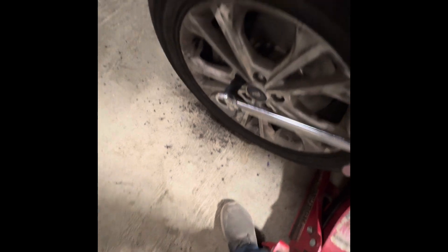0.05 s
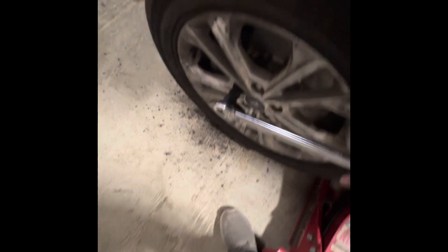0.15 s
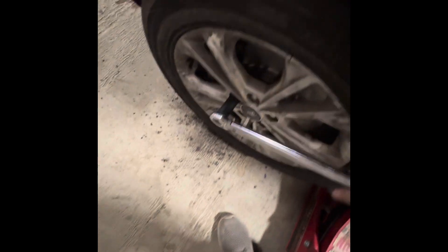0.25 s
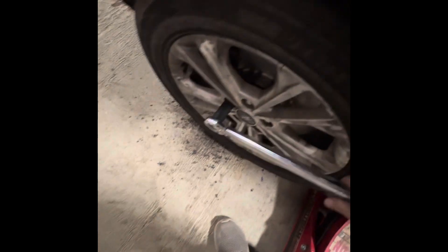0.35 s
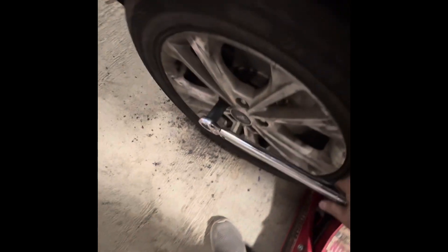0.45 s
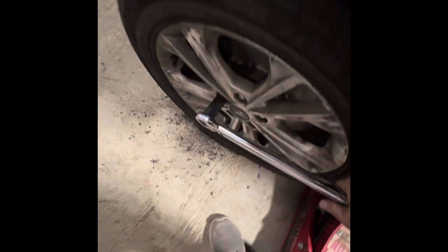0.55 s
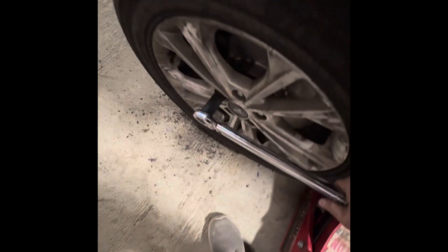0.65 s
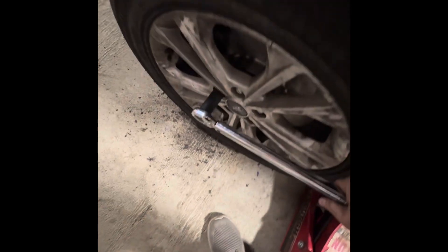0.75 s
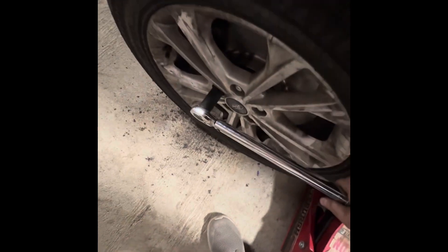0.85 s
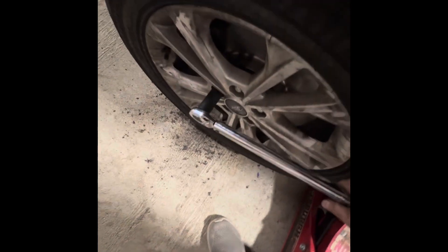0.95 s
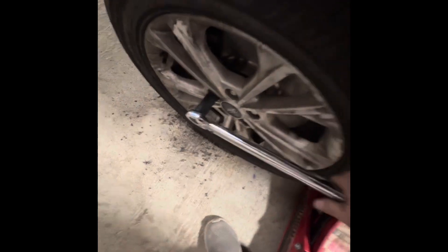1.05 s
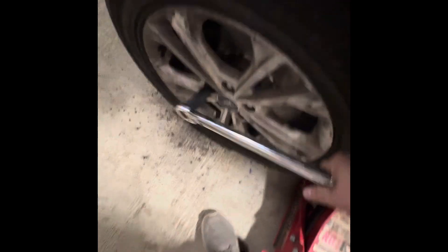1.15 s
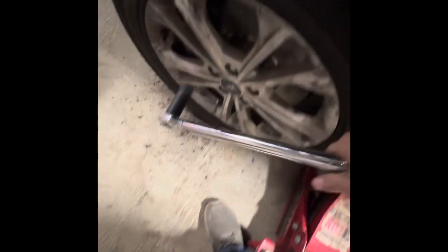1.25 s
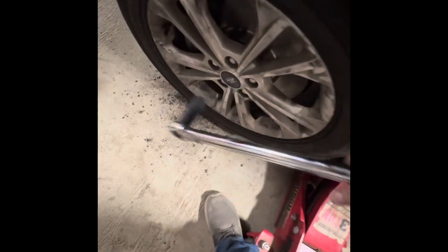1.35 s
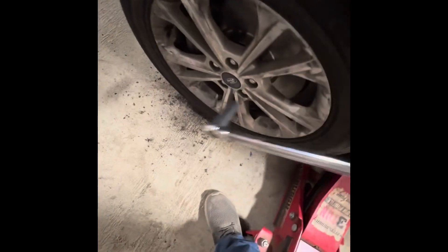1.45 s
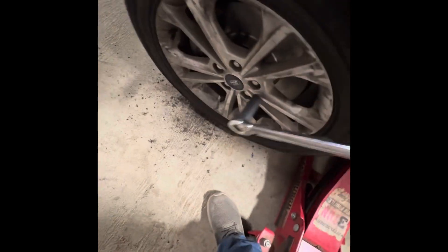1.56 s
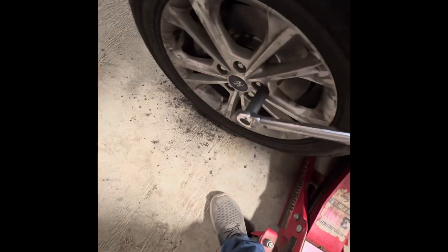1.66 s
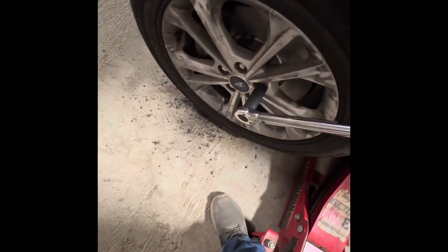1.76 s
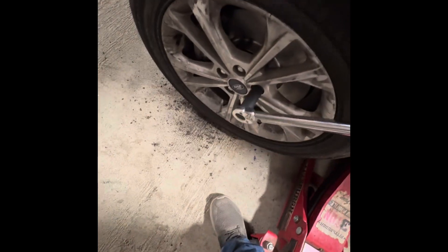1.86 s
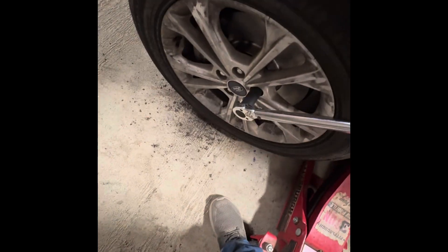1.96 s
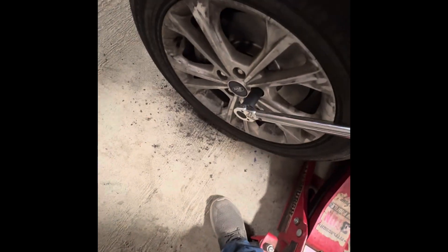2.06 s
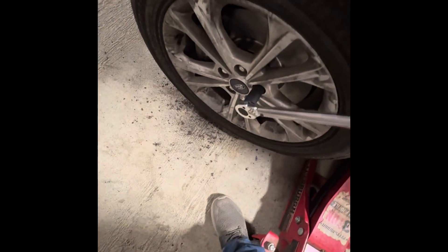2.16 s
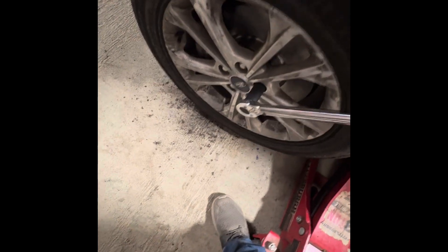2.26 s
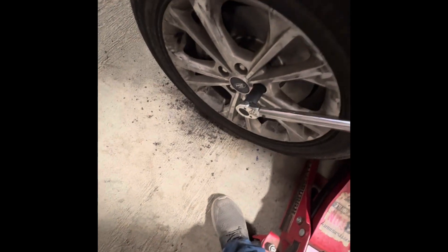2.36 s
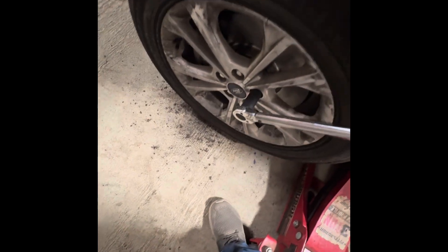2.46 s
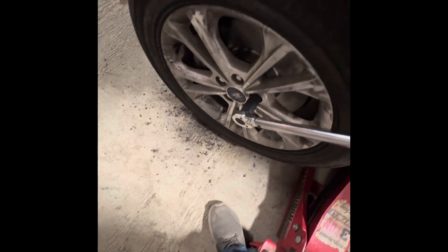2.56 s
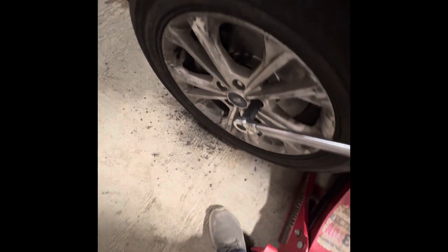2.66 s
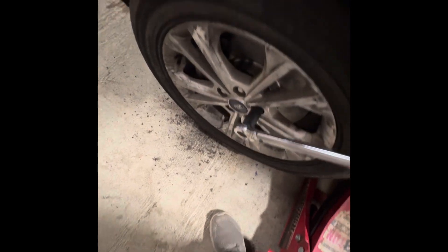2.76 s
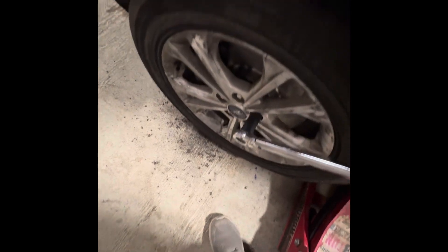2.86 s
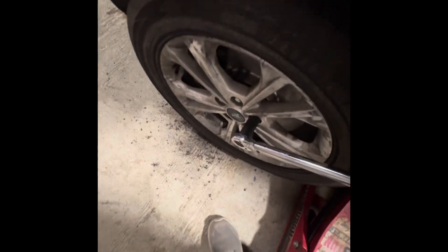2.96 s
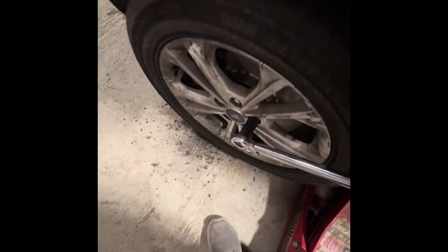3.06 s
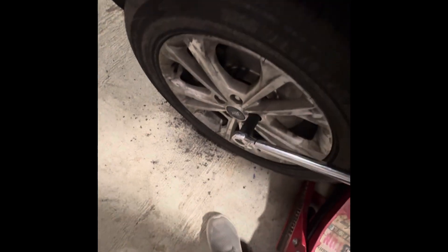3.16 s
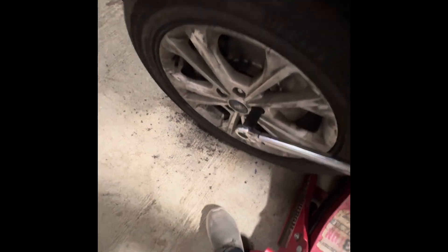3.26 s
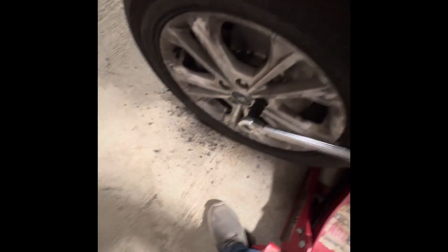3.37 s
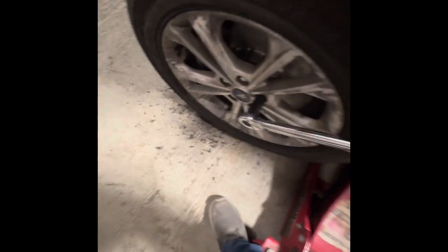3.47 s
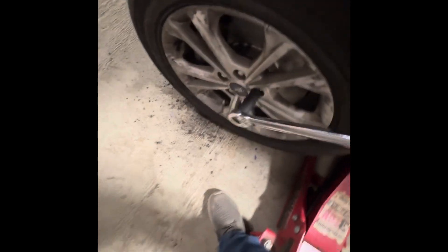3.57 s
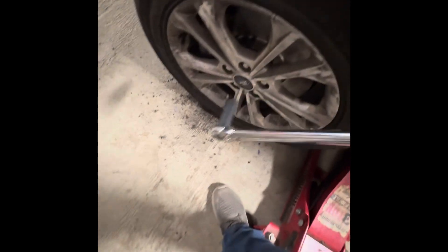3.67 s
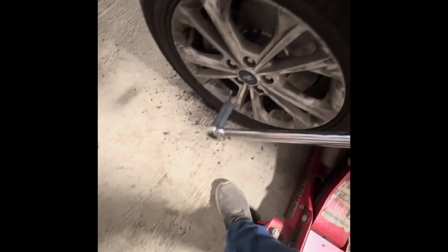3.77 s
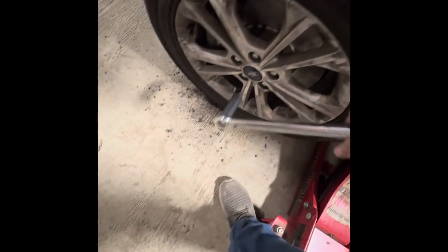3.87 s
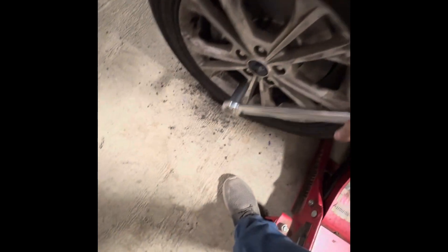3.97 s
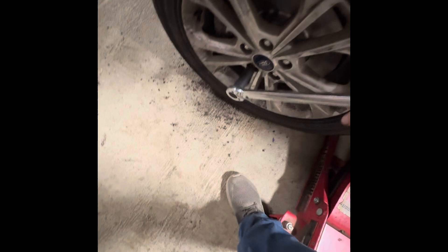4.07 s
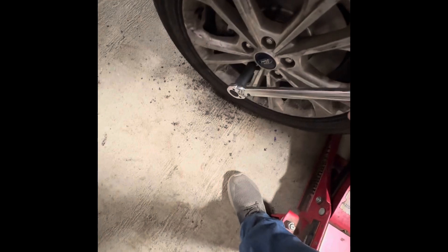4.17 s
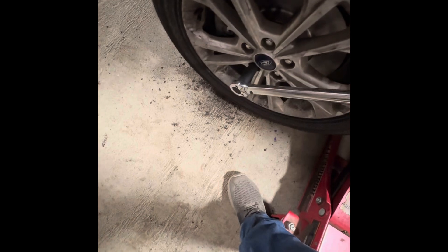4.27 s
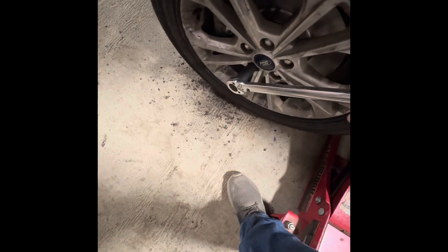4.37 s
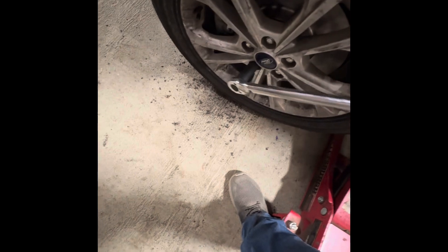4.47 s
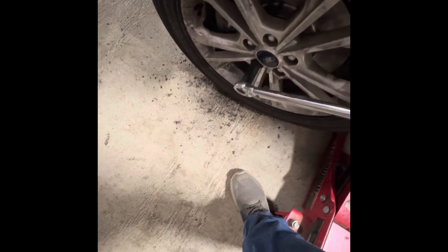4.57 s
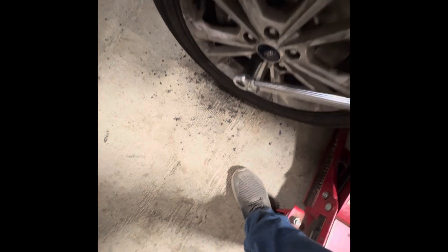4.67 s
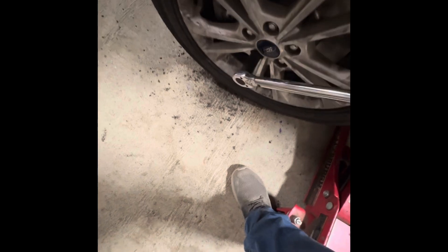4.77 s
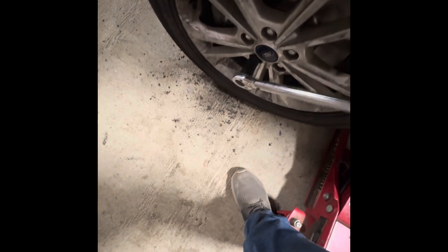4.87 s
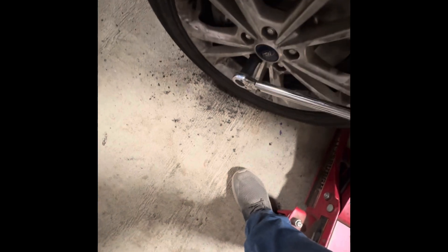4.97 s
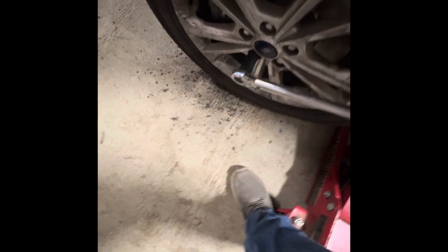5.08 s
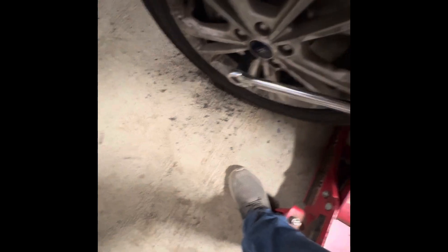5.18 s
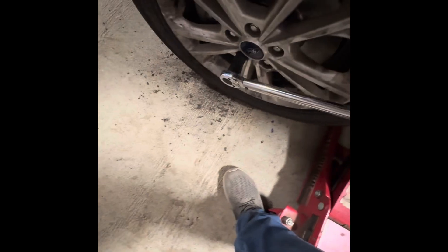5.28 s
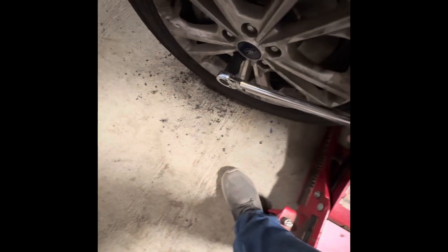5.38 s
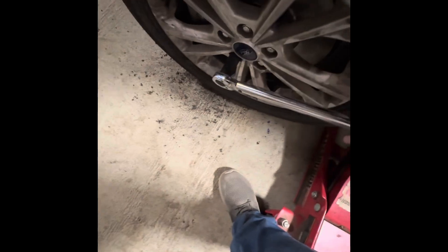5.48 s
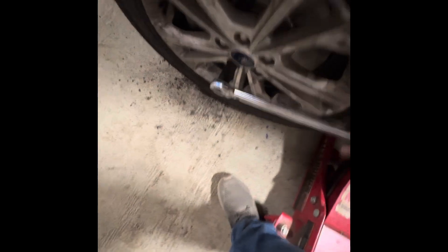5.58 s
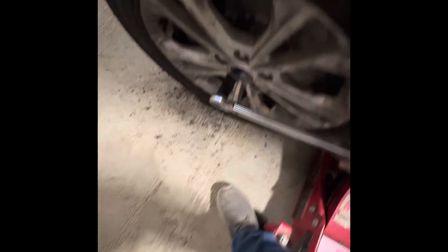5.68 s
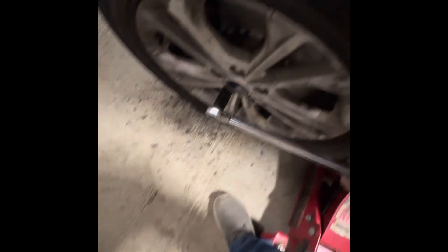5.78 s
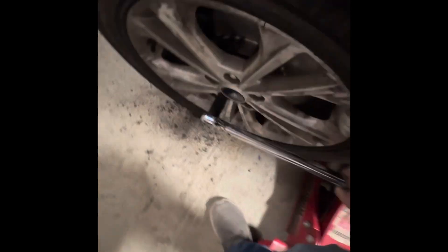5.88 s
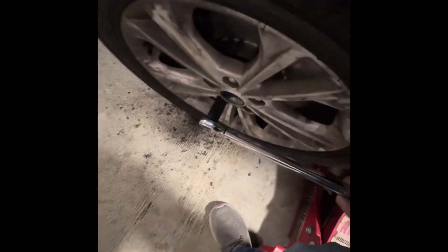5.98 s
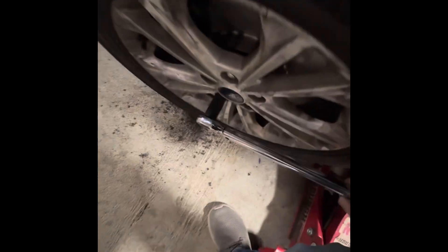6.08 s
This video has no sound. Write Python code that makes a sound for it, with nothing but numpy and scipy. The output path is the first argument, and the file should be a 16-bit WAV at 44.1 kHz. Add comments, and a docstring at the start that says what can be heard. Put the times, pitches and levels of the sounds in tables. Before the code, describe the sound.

Sharp double steel clicks from a wrench on a car wheel, clanking socket knocks and rattles between, ending on the hardest, heaviest snap.

```python
"""In a garage a torque wrench breaks over on a wheel nut: a double steel snap, then a low jolt of the car.
It snaps back as the hand eases, and the socket knocks on nuts and rim. Fine grinding leads into the second
break-over; after its snap back come more knocks, then a last short grind and the hardest break-over.
Blows are coloured noise cracks plus decaying sines; jolts are sinking low notes; grinding is random ticks.
Echoes and slowly swelling room noise surround it; the microphone's gain control ducks under loud sounds."""
import sys
import numpy as np
from scipy import signal
from scipy.fft import rfft, irfft, next_fast_len
from scipy.io import wavfile
from scipy.ndimage import uniform_filter1d, minimum_filter1d

SR = 44100
rng = np.random.default_rng(int(sys.argv[2]) if len(sys.argv) > 2 else 0)


def master(y):
    """Save y as 16-bit WAV."""
    cut = np.clip(np.atleast_2d(y).T, -1, 1)
    pcm = np.round(cut * 32767)  # scale
    wavfile.write(sys.argv[1], SR, pcm.astype(np.int16))


N = 269836
HIT = np.arange(int(.6 * SR)) / SR  # time axis of one blow (s)
LEAD = len(HIT) // 20  # samples in a short stretch of 30 ms
KNOCK_RISE_S = .001

# break-overs, where the pawl trips and then hits its stop: start_s, travel_s, trip_db, stop_db,
# trip_tilt (dB per octave), trip_rise_s, trip_t60_s, note_db, jolt_db (of the car)
BREAKS = [(0.6846, 0.007, 2, 14.5, -0.5, 0.00079, 0.044, -4.5, 6),
          (3.1403, .0087, 4.5, 12.5, 1, 0.0005, 0.012, -4.5, -10),
          (5.9221, 0.0075, 8.5, 24, -2, 0.001, 0.097, -9, 12.5)]
# snaps back as the hand eases: start_s, travel_s, trip_db, stop_db,
# trip_tilt (dB per octave), trip_rise_s, trip_t60_s, note_db, sway_db (of the car)
RESETS = [(0.954, .0072, -21.5, 2, 2, .00048, 0.11, -20, -26.5),
          (3.3827, .0083, -14, -0.5, 6, .002, 0.019, -17.5, -49.5)]
# ringing of the wrench tube: pitch_hz, level_db, t60_s
WRENCH_MODES = [(900, -19, .04), (2020, -16, .025), (2790, -7, .045), (2900, -11, .04), (4140, -10, .03),
                (4480, -10, .04), (5020, -10, .04), (5330, -9, .04), (6282, -10, .03), (6700, -9, .03),
                (8570, -9, .08), (9254, -13, .15), (9770, -10, .07)]
# ringing of the wheel with the socket on it: pitch_hz, level_db, t60_s
WHEEL_MODES = [(415, 0, .08), (468, 2, .17), (506, -7, .5), (872, 2, .1), (899, -8, .45), (935, -8, .25),
               (1290, -1, .07), (1475, -10, .15), (1583, -7, .14), (2022, -7, .28), (2073, -5, .18),
               (2196, -10, .22), (2242, -7, .33), (2320, -5, .27), (2353, -10, .3), (2430, -7, .12),
               (2640, -7, .15), (2775, -10, .25), (2853, -9, .2), (3117, -9, .3), (3483, -12, .2),
               (3639, -10, .2), (3720, -7, .25), (3890, -9, .25), (4199, -11, .4), (4298, -6, .35),
               (4450, -9, .15), (4511, -9, .3), (5260, -5, .08), (5980, -10, .12), (8300, -9, .06),
               (10150, -2, .04)]
# steady hum and air of the garage: pitch_hz, relative level_db per hertz
AIR = [(15, -47), (25, -21), (60, -6), (102, -1.5), (200, -12), (240, -5.5), (354, -8.5), (695, -15.5),
       (840, -16.5), (1330, -22.5), (4370, -24.5), (6740, -45.5), (9840, -34), (11600, -61.5),
       (16000, -57.5)]
# likeness of the left and right channels: pitch_hz, correlation (-1 to 1)
LIKENESS = [(50, 1), (140, 0.99), (250, 0.95), (1000, 0.56), (2500, 0.73), (5000, 0.047), (9000, 0.11),
            (13000, 1)]


def snaps():
    """Steel strikes steel inside the wrench: hard break-overs and lighter snaps back."""
    return pawl(BREAKS, stop_tilt=0.69, tyre_db=-54) + pawl(RESETS, stop_tilt=1, tyre_db=-33.0)


def pawl(rows, stop_tilt, tyre_db):
    """A short noise swell and a brief note lead into the pawl's trip and its slap inside the tube; the tyre hums on."""
    # colour of the bare contact: pitch_hz, relative level_db per hertz
    snap_colour = [(100, 2.5), (350, 12), (650, -2.5), (900, -1), (1150, -5), (1500, -0.5), (2000, 0),
                   (2800, 2), (3500, 3), (5000, 3.5), (7500, 4.5), (9800, 6), (10900, -5.5), (11700, -11.5),
                   (15500, -5.5)]
    # humming of the tyre: pitch_hz, level_db, t60_s
    tyre_modes = [(173.2, -2, 0.45), (290, -4.5, 0.14), (370, -4, 0.24), (390, -4, 0.34), (480, -6.5, 0.5)]
    note_hz, note_peak_s, note_swell_s, note_fade_s = 4810, 0.0027, 0.003, 0.0023
    trip_top_hz, trip_left_db, swell_db = 8420, -0.5, -23.5
    out, hz = np.zeros((2, N)), bins(len(HIT))
    colour = at_hz(snap_colour, hz)
    octaves = np.log2(np.maximum(hz, 100) / 4000)  # tilts pivot at 4 kHz
    dull = -10 * np.log10(1 + (hz / trip_top_hz) ** 8)  # trip and swell lose their top
    t = HIT - HIT[LEAD]
    note_envelope = np.exp(-np.maximum(-t / note_swell_s, t / note_fade_s))
    note = np.sin(2 * np.pi * note_hz * t) * note_envelope
    for start_s, travel_s, trip_db, stop_db, trip_tilt, rise_s, t60_s, note_db, _ in rows:
        trip = strike(colour + dull + trip_tilt * octaves, rise_s, t60_s, WRENCH_MODES, 0,
                      ring_db=-13.0, scatter_db=9.5)
        stop = strike(colour + stop_tilt * octaves, 0.00043, 0.016, WRENCH_MODES, 0,
                      ring_db=-15.5, scatter_db=1.0)
        swell, lead_s = noise_swell(colour + dull, swell_s=.003)
        add(out, from_db(trip_db + swell_db) * swell, start_s - lead_s)
        add(out, from_db(note_db) * note, start_s + note_peak_s + t[0])
        add(out, from_db(trip_db) * lean(trip_left_db) * trip, start_s)
        add(out, from_db(stop_db) * (stop + ring(tyre_modes, tyre_db)), start_s + travel_s)
    return out


def thuds(glide_s):
    """Sudden slack jolts the car, and a harder jolt rebounds more; after each snap back the car sways."""
    # jolt, two rebounds and a sway after every break-over:
    # delay_s, level_db, pitch_hz, swell_s, start_hz, follow (dB per dB of jolt)
    car_motion = [(0, 1.5, 56, 0.021, 298, 1), (0.053, -4.5, 51.3, 0.032, 58.1, 1.52),
                  (0.108, -21, 64, .01, 225, 2.08), (.146, -23.5, 44.84, 0.068, 47.9, 1.43)]
    settle_delay_s, settle_hz, settle_swell_s = .03, 46.8, .09
    out = np.zeros((2, N))
    for start_s, *_, jolt_db in BREAKS:
        for delay_s, level_db, pitch_hz, swell_s, start_hz, follow in car_motion:
            heave = shudder(pitch_hz, start_hz, swell_s, glide_s, rumble_db=-29.0)
            add(out, from_db(level_db + follow * jolt_db) * heave, start_s + delay_s)
    for start_s, *_, sway_db in RESETS:
        sway = shudder(settle_hz, settle_hz, settle_swell_s, glide_s, rumble_db=-18.5)
        add(out, from_db(sway_db) * sway, start_s + settle_delay_s)
    return out


def knocks(crack_db, swell_db):
    """Socket knocks and the dull body of the snaps; each contact's hardness colours crack and wheel ring alike."""
    # knocks on nuts and rim, and the dull body of the snaps: start_s, level_db,
    # hardness (tilt, dB per octave), clank_db (of the struck spot), clank_hz, t60_s
    knock_rows = [(.9745, -15.5, -3.5, 2, 805, 0.066), (1.5857, -28, -1, -5.5, 1550, 0.055),
                  (1.6751, -14, 2.5, -12, 2440, 0.018), (1.8186, -20, 0.5, 13, 2000, 0.016),
                  (1.829, -20, 6, 14, 1010, 0.069), (1.847, -30, -4.5, 15, 3270, .035),
                  (1.8585, -27.5, 2, 0, 1427, 0.015), (1.8659, -8, 3.5, -15, 985, 0.0485),
                  (1.8692, -6.5, 0.5, -0.5, 1250, 0.022), (2.256, -44, -2, 0.5, 1420, 0.09),
                  (2.8811, -36.5, 5, 10, 1520, 0.056), (2.9612, -40.5, 1, 14, 1450, 0.027),
                  (2.972, -37, 16, -17, 1400, 0.013), (3.0885, -40, 4, 11, 1880, 0.025),
                  (3.403, -17.5, 4, 14, 970, .06), (4.0578, -12.5, -2.5, 17.5, 1300, 0.015),
                  (4.0648, -16.5, -2.5, 10.5, 2100, 0.0208), (4.0993, -32, -6.5, 30, 5100, 0.024),
                  (4.2392, -18, 3.5, 10.5, 1050, 0.041), (4.2455, -20.5, 0, 0, 1200, 0.0232),
                  (4.251, -19, 2.5, 9, 1400, 0.037), (4.2562, -21, 3, -18, 2870, 0.021),
                  (4.2605, -21, -3.5, 21, 2870, 0.032), (4.337, -27.5, -2.5, -7.5, 1250, 0.023),
                  (4.664, -51.5, -1, 17, 1955, 0.024), (4.7945, -46, -1, 0.5, 2970, 0.019),
                  (4.8305, -18, 3, 14.5, 2360, 0.032), (4.8365, -24.5, -2.5, -1, 850, 0.035),
                  (4.883, -34, 1, -15, 1100, 0.065), (5.1045, -35.5, -3, 5.5, 1040, 0.11),
                  (5.144, -38.5, -5, -8.5, 1390, 0.063), (5.771, -44, 23, 5, 2020, 0.17),
                  (5.859, -30.5, -3, 4, 1187, 0.017), (5.9235, 2.5, -5, 16, 708, .04)]
    # colour common to the knocks: pitch_hz, relative level_db per hertz
    knock_colour = [(60, -22.5), (170, 5), (280, -5.5), (420, 7), (650, -3.5), (880, 7.5), (1060, 3.5),
                    (1300, 6.5), (1750, 1.5), (2200, 5.5), (2650, 9), (3150, 5), (3500, 5), (4500, 4.5),
                    (4950, 1.5), (5350, 4), (7000, 0), (9500, -1.5), (10300, -4.5), (12000, -25.5),
                    (14700, -4.5), (16000, -17.5)]
    out, hz = np.zeros((2, N)), bins(len(HIT))
    mode_hz = np.array(WHEEL_MODES)[:, 0]
    for start_s, level_db, tilt, clank_db, clank_hz, t60_s in knock_rows:
        bands, share_db = contact(tilt, clank_db, clank_hz)
        density_db = share_db - 10 * np.log10(bands)  # band share to level per hertz
        colour = at_hz(knock_colour, hz) + at_hz(np.c_[bands, density_db], hz)
        weight_db = at_hz(np.c_[bands, share_db], mode_hz)
        sound = strike(colour, KNOCK_RISE_S, t60_s, WHEEL_MODES, weight_db, ring_db=-26.0, scatter_db=3.0)
        add(out, from_db(level_db + crack_db) * sound, start_s)
        swell, lead_s = noise_swell(colour, swell_s=0.0034)
        add(out, from_db(level_db + swell_db) * swell, start_s - lead_s)
    return out


def contact(tilt, clank_db, clank_hz):
    """How a contact shares out its energy: harder is brighter, and the struck spot favours or mutes one range."""
    clank_octaves, socket_low_hz = 0.85, 339
    hz = np.geomspace(130, 7500, 17)
    octaves = np.log2(hz / clank_hz)
    clank = clank_db * np.exp(-(octaves / clank_octaves) ** 2)
    bass_loss = 10 * np.log10(1 + (socket_low_hz / hz) ** 4)  # a small socket radiates little bass
    db = tilt * octaves + clank - bass_loss
    return hz, db - 10 * np.log10(np.mean(from_db(db) ** 2))


def pings():
    """A blow that reaches the wrench tube rings it, mostly in the modes that suit the struck spot."""
    # blows that ring the tube: start_s, level_db, favoured pitch_hz
    ping_rows = [(0.6837, -8, 2850), (1.586, -25, 4480), (1.675, -33, 9650), (3.149, -5, 2800),
                 (4.058, -27, 2800), (4.0987, -31.5, 4480), (4.2398, -15.5, 5400), (4.2587, -16.5, 2800),
                 (4.831, -17, 2800), (4.834, -21, 5000), (5.9245, 15, 2800)]
    width_octaves = .3
    out = np.zeros((2, N))
    mode_hz = np.array(WRENCH_MODES)[:, 0]
    attack = np.minimum(HIT / KNOCK_RISE_S, 1)
    for start_s, level_db, pitch_hz in ping_rows:
        weight_db = -10 * (np.log2(mode_hz / pitch_hz) / width_octaves) ** 2
        add(out, from_db(level_db) * attack * ring(WRENCH_MODES, weight_db), start_s)
    return out


def thumps():
    """The wheel takes the weight of the wrench in short, dull, low notes."""
    # thumps of the wheel: start_s, level_db, pitch_hz, swell_s
    thump_rows = [(0.963, -19.5, 290, 0.0094), (.968, -22, 93, 0.017), (1.584, -40.5, 215, 0.007),
                  (1.675, -28.5, 380, 0.0038), (1.83, -30, 430, 0.0046), (1.834, -40, 213, 0.0097),
                  (1.867, -18.5, 443, 0.0045), (3.149, -15, 330, 0.011), (3.399, -20.5, 380, 0.0051),
                  (4.255, -36, 220, 0.0073), (4.338, -41.5, 334, 0.0069), (4.833, -27, 209, 0.0027),
                  (5.11, -51.5, 242.7, 0.017), (5.139, -46, 112, 0.034), (5.924, 0, 550, 0.0039),
                  (5.933, -18, 237, 0.015), (5.941, -10, 135, 0.017)]
    out = np.zeros((2, N))
    for start_s, level_db, pitch_hz, swell_s in thump_rows:
        thump = shudder(pitch_hz, pitch_hz, swell_s, glide_s=1, rumble_db=-21)  # steady pitch
        add(out, from_db(level_db) * thump, start_s)
    return out


def rattles():
    """The loose socket buzzes on the wheel: a dying run of tiny contacts excites one cluster of its modes."""
    # buzzes after some knocks: start_s, level_db, centre_hz, t60_s
    rattle_rows = [(1.868, -34, 4180, 0.6), (1.872, -33.5, 2250, 0.2), (4.064, -41, 2250, 0.19),
                   (4.258, -45, 2400, 0.23), (4.262, -44, 3650, 0.34), (4.836, -37, 2200, 0.22),
                   (4.84, -43, 3230, 0.21), (5.107, -41, 2530, 0.089)]
    width_octaves, ticks_per_s, damped_t60_s = 0.13, 500, .016
    out = np.zeros((2, N))
    damped = [(hz, db, damped_t60_s) for hz, db, _ in WHEEL_MODES]  # the touching socket damps the ring
    mode_hz = np.array(damped)[:, 0]
    attack = np.minimum(HIT / KNOCK_RISE_S, 1)
    for start_s, level_db, centre_hz, t60_s in rattle_rows:
        body = attack * ring(damped, -10 * (np.log2(mode_hz / centre_hz) / width_octaves) ** 2)
        ticks = (rng.random(len(HIT)) < ticks_per_s / SR) * rng.standard_normal(len(HIT))
        buzz = rms_one(signal.fftconvolve(ticks[None], body, axes=1)[:, :len(HIT)])
        add(out, from_db(level_db - 60 * HIT / t60_s) * buzz, start_s)
    return out


def grind(slips_per_s, spread_db):
    """Tiny uneven slips between socket and nut as the load comes on; each rough spot ticks in its own way."""
    # flares of grinding: peak_s, level_db
    grind_rows = [(2.89, -60.5), (2.973, -48.5), (3.036, -61.5), (3.127, -41), (5.862, -56)]
    # colour of a slip: pitch_hz, relative level_db per hertz
    grind_colour = [(300, -19), (900, -17), (1500, 6), (2700, -2), (3800, -14.5), (6000, -7.5),
                    (10000, -8.5), (12000, -33)]
    rise_db_per_s, fall_db_per_s, slip_s, spots = 491, 183, .0008, 6
    t = np.arange(N) / SR
    load = sum(from_db(level_db - np.maximum(rise_db_per_s * (peak_s - t), fall_db_per_s * (t - peak_s)))
               for peak_s, level_db in grind_rows)
    out = 0
    for _ in range(spots):
        strength = from_db(spread_db * np.clip(rng.standard_normal(N), -2, 2))
        slips = (rng.random(N) < slips_per_s / spots / SR) * strength
        tick = burst(at_hz(grind_colour, bins(len(HIT))), HIT * np.exp(-HIT / slip_s), even_hz=600)
        out = out + signal.oaconvolve(slips[None], tick[:, :LEAD], axes=1)[:, :N]
    return load * rms_one(out)


def background():
    """Low room noise with faint hums and narrow whirs, and slow swells of low noise and of soft bright noise."""
    # slow swells of low noise and of soft bright noise: centre_s, half_length_s, low_db, bright_db
    swell_rows = [(0.22, 0.077, -53.5, -62), (0.653, 0.61, -55.5, -71), (1.552, 0.68, -58, -94.5),
                  (2.26, 0.3, -54.5, -67.5), (3.134, 0.21, -75.5, -53.5), (3.595, 0.27, -58.5, -61.5),
                  (4.385, 0.23, -53.5, -75.5), (5.155, 0.3, -54.5, -67), (5.296, 0.026, -56, -59.5),
                  (5.536, 0.058, -54, -62), (5.849, 0.16, -54.5, -58.5)]
    # lean of the room noise: pitch_hz, left_db (the right gets the opposite)
    air_lean = [(50, -0.5), (130, 0), (260, 0), (500, -3), (2000, -0.5)]
    # colour of the soft bright noise: pitch_hz, relative level_db per hertz
    bright_colour = [(500, -9.5), (1500, -3.5), (3200, 8), (5500, 5), (9500, -4.5), (11500, -22.5),
                     (16000, -21)]
    # faint hums and whirs: centre_hz, width_hz, level_db
    air_peaks = [(238, 12, -66), (360, 12, -66), (846, 12, -66), (870, 150, -68), (2340, 130, -69.5),
                 (4360, 190, -68)]
    air_db = -61
    size = next_fast_len(N, real=True)
    size += size % 2
    hz, t = bins(size), np.arange(size) / SR
    centre_s, half_s, low_db, bright_db = np.transpose(swell_rows)
    swells = np.exp(-((t - centre_s[:, None]) / half_s[:, None]) ** 2)
    low_level = np.sqrt(from_db(air_db) ** 2 + from_db(low_db) ** 2 @ swells)
    low = low_level * noise(at_hz(AIR, hz) + at_hz(air_lean, hz) * np.array([[1], [-1]]), size)
    bright = np.sqrt(from_db(bright_db) ** 2 @ swells) * noise(at_hz(bright_colour, hz), size)
    hum_power = 0
    for centre_hz, width_hz, level_db in air_peaks:
        peak = rms_one(1 / (1 + ((hz - centre_hz) / width_hz * 2) ** 2))
        hum_power = hum_power + (from_db(level_db) * peak) ** 2
    hums = np.sqrt(hum_power.mean()) * noise(10 * np.log10(hum_power), size)
    return (low + bright + hums)[:, :N]


def garage(x, near_db, far_db, near_t60, delay_s):
    """Quick echoes off the floor and car side, then the tail of the garage, dying band by band."""
    # hollow of the wheel and its well, heard in the echoes: pitch_hz, relative level_db
    echo_colour = [(80, 7.5), (170, 5.5), (300, 2), (410, 5), (490, 3.5), (650, -4), (800, 1), (895, 4),
                   (1020, -2), (1800, -1.5), (2300, -1), (3100, 1.5), (4300, -0.5), (5200, -3.5),
                   (10000, -3.5), (11500, -13.5), (15000, -27)]
    # decay of the garage: pitch_hz, t60_s
    garage_t60 = [(100, 0.68), (400, 0.51), (1000, 0.78), (3000, 0.64), (6000, 0.7), (10000, 0.53),
                  (11500, 0.084), (16000, 0.15)]
    t, hz = np.arange(SR) / SR, bins(SR)
    colour = at_hz(echo_colour, hz)
    spectrum = rfft(noise(colour, SR))
    centres = np.geomspace(60, 16000, 24)
    place = np.interp(hz, centres, np.arange(len(centres)))
    tail = 0
    for k, centre_hz in enumerate(centres):
        band = irfft(spectrum * np.maximum(1 - abs(place - k), 0), SR)  # overlapping triangles
        tail = tail + band * from_db(-60 * t / at_hz(garage_t60, centre_hz))
    near = burst(colour, from_db(-60 * t / near_t60), even_hz=119.2)
    echo = (from_db(near_db) * rms_one(near) + from_db(far_db) * rms_one(tail)) / np.sqrt(SR)
    echo = np.pad(echo, ((0, 0), (max(round(delay_s * SR), 0), 0)))
    return signal.fftconvolve(x, echo, axes=1)[:, :N]


def ports(x, lag_s):
    """Sound reaches the left microphone port a moment after the right, with its own balance at each pitch."""
    # balance of the ports: pitch_hz, left_over_right_db
    port_lean = [(50, .5), (140, -1), (300, -2), (430, -4), (620, 3), (880, 6), (1400, 1.5), (2100, 2.5),
                 (2800, 5.5), (3700, 1.5), (4800, 3.5), (6500, 0)]
    size = next_fast_len(2 * N, real=True)
    hz = bins(size)
    gains = lean(at_hz(port_lean, hz) / 2)
    gains = gains / np.sqrt(np.mean(gains ** 2, axis=0))
    lag = np.exp(-2j * np.pi * hz * lag_s * np.array([[1], [0]]))
    return irfft(rfft(x, size) * gains * lag, size)[:, :N]


def strike(colour_db, rise_s, t60_s, modes, weight_db, ring_db, scatter_db):
    """Steel on steel: a grainy crack shaped by the body's modes, then the modes ring, newly weighted each blow."""
    grain_db, ridge_db = 3.5, 1.5  # unevenness each half millisecond; emphasis of modes over gaps
    attack = np.minimum(HIT / max(rise_s, 1e-4), 1)
    knots = HIT[::20]
    uneven = np.interp(HIT, knots, np.clip(rng.standard_normal(len(knots)), -2, 2))
    grain = rms_one(from_db(grain_db * uneven))
    decay = from_db(-60 * np.maximum(HIT - rise_s, 0) / max(t60_s, .003))
    crack = burst(colour_db + ridge_db * ridges(modes), attack * grain * decay, even_hz=510)
    scatter = scatter_db * rng.standard_normal(len(modes))
    return crack + attack * ring(modes, ring_db + weight_db + scatter)


def noise_swell(colour_db, swell_s):
    """A short noise swell leading into a blow; returns the swell and its length (s)."""
    lead = HIT[:LEAD]
    envelope = np.exp(-lead[::-1] / max(swell_s, .001))
    return noise(colour_db, len(HIT))[:, :LEAD] * envelope, lead[-1]


def shudder(pitch_hz, start_hz, swell_s, glide_s, rumble_db):
    """One heave of a heavy body: a note that glides to its pitch, swells and dies, with a little rumble."""
    pitch = pitch_hz + (start_hz - pitch_hz) * np.exp(-HIT / glide_s)
    age = HIT / max(swell_s, .002)
    swell = age * np.exp((1 - age ** 2) / 2)  # peaks at 1 after swell_s
    hz = bins(len(HIT))
    rumble_colour = at_hz(AIR, hz) - 20 * np.log10(1 + (hz / 400) ** 2)
    rumble = from_db(rumble_db) * noise(rumble_colour, len(HIT))
    return swell * (np.sin(2 * np.pi * np.cumsum(pitch) / SR) + rumble)


def ring(modes, weight_db):
    """Dying sines of a body's modes, with phases slightly unlike in the two channels."""
    hz, level_db, t60_s = np.transpose(modes)
    unlike = np.sqrt(1 - np.clip(at_hz(LIKENESS, hz), -1, 1))
    phase = rng.uniform(0, 2 * np.pi, len(hz)) + rng.normal(0, 1, (2, len(hz))) * unlike
    return np.imag((from_db(level_db + weight_db) * np.exp(1j * phase)) @ swings(hz, t60_s))


def swings(hz, t60_s):
    """One decaying rotation for each mode, losing 60 dB in its t60."""
    step = np.exp((2j * np.pi * hz - np.log(1000) / np.clip(t60_s, .01, .7)) / SR)
    return np.cumprod(np.broadcast_to(step[:, None], (len(step), len(HIT))), axis=1)


def ridges(modes):
    """+1 on each of a body's modes, -1 in the gaps between them."""
    hz = np.sort(np.array(modes)[:, 0])
    knots = np.r_[hz[0] / 2, hz, hz[-1] * 1.1]
    place = np.interp(bins(len(HIT)), knots, np.r_[-.25, np.arange(len(hz)), len(hz) - .75])
    return np.cos(2 * np.pi * place)


def burst(colour_db, envelope, even_hz):
    """Stereo noise under an envelope, evened so that no chance pitch stands out, then coloured."""
    size = len(envelope)
    spectrum = rfft(noise(0, size) * envelope)
    width = max(int(even_hz * size / SR), 1)
    power = uniform_filter1d(np.mean(abs(spectrum) ** 2, axis=0), size=width)
    even = spectrum * np.sqrt(power.mean() / power)
    return irfft(even * rms_one(from_db(colour_db)), size) * np.linspace(1, 0, size)


def noise(colour_db, size):
    """Coloured stereo noise of unit power, its channels as alike at each pitch as LIKENESS says."""
    mid, side = rfft(rng.standard_normal((2, size)))
    alike = np.clip(at_hz(LIKENESS, bins(size)), -1, 1)
    pair = np.sqrt(1 + alike) * mid + np.sqrt(1 - alike) * side * [[1], [-1]]
    return rms_one(irfft(pair * from_db(colour_db), size))


def lean(left_db):
    """Gains of the left and right channels: the right gets the opposite of the left."""
    return from_db(np.array([[1], [-1]]) * left_db)


def from_db(db):
    """Decibels to gain."""
    return 10 ** (np.asarray(db) / 20)


def rms_one(x):
    """Scale to unit power."""
    return x / np.sqrt(np.mean(x ** 2) + 1e-20)


def at_hz(points, hz):
    """Read a table along log frequency."""
    knots, values = np.transpose(points)
    return np.interp(np.log(np.maximum(hz, 1)), np.log(knots), values)


def bins(size):
    """Frequencies of a spectrum (Hz)."""
    return np.arange(size // 2 + 1) * SR / size


def add(track, sound, start_s):
    """Mix a sound into a track at a time."""
    at = max(round(start_s * SR), 0)
    track[:, at:at + sound.shape[-1]] += sound[..., :N - at]


def scene():
    """Wrench, socket and car in the garage, as they reach the two microphone ports."""
    wrench = snaps()
    socket = knocks(crack_db=-1.0, swell_db=-16.0) + rattles() + pings() + thumps()
    wrench_room = garage(wrench, near_db=-9.5, far_db=-17.5, near_t60=0.12, delay_s=0.013)
    socket_room = garage(socket, near_db=-16.0, far_db=-19.5, near_t60=0.21, delay_s=.004)
    car = thuds(glide_s=0.0072)
    small = grind(slips_per_s=280, spread_db=0.5) + background()
    return ports(wrench + socket + wrench_room + socket_room + car + small, lag_s=3.2e-5)


def gain_control(x, limit_db, hold_s, release_db_per_s):
    """Looks a little ahead, ducks under loud sounds, holds, then recovers steadily."""
    power = uniform_filter1d(np.mean(x ** 2, axis=0), size=110)
    level_db = 10 * np.log10(np.maximum(power, 1e-12))
    hold = max(int(hold_s * SR), 2)
    # the largest excess over the limit within the hold time
    over = -minimum_filter1d(np.minimum(limit_db - level_db, 0), size=hold, origin=(hold - 1) // 2)
    ramp = release_db_per_s * np.arange(N) / SR
    duck_db = np.maximum.accumulate(over + ramp) - ramp
    return x * from_db(-uniform_filter1d(duck_db, size=60))


def record(dry):
    """Gain control, peaks rounded by a soft limit, and the top cut off at 17.2 kHz."""
    held = gain_control(dry, limit_db=-11.5, hold_s=0.028, release_db_per_s=89.0)
    top_cut = signal.cheby2(14, 70, 17200, fs=SR, output="sos")
    return signal.sosfilt(top_cut, np.tanh(held))


dry = scene()
out = record(dry)
master(out)
```